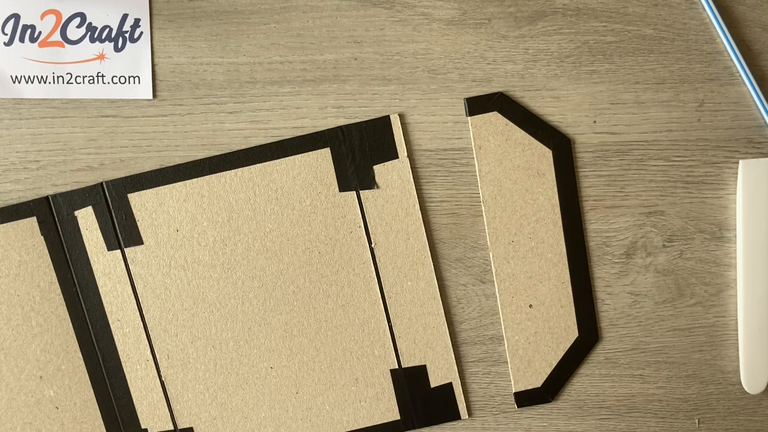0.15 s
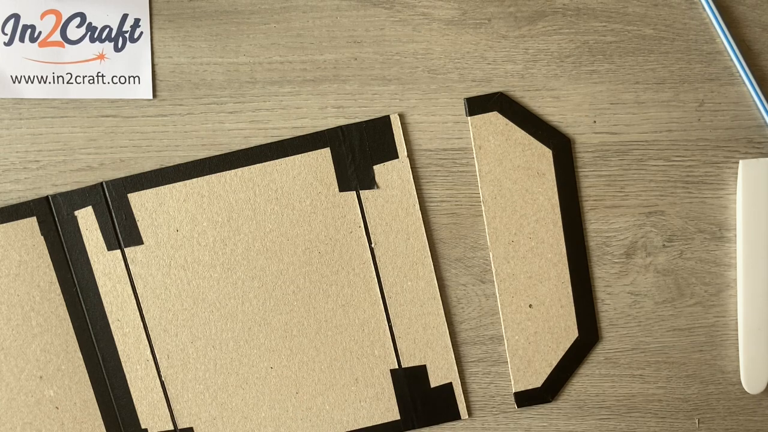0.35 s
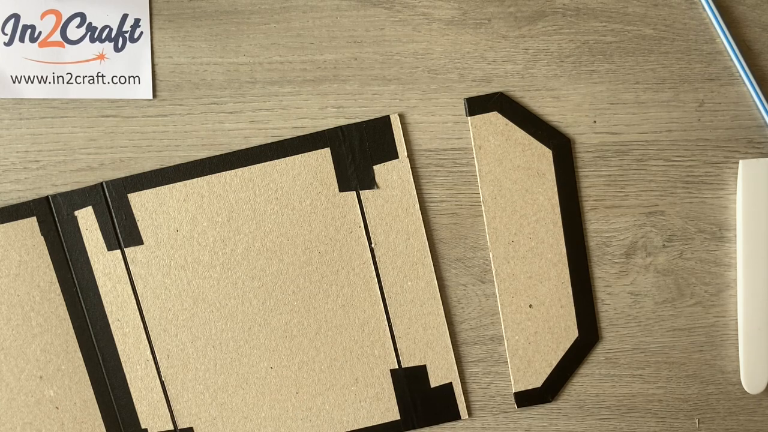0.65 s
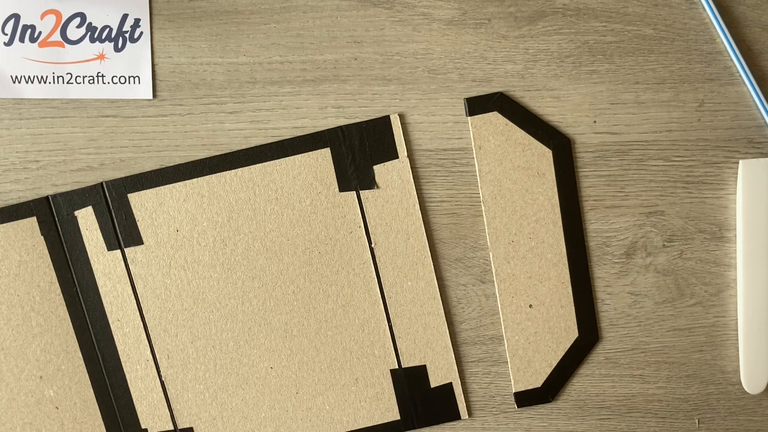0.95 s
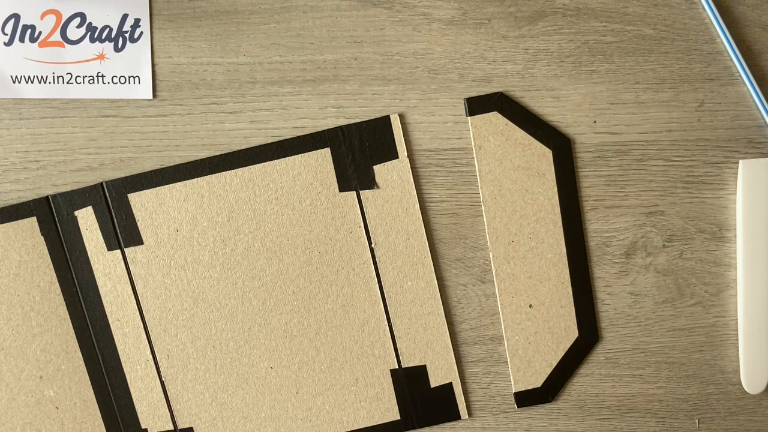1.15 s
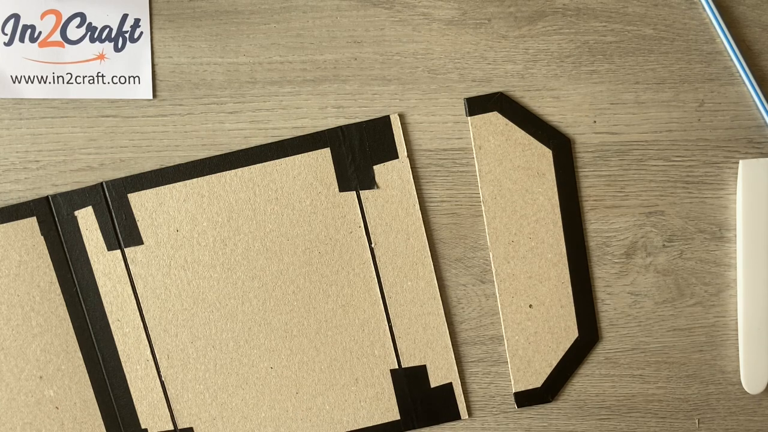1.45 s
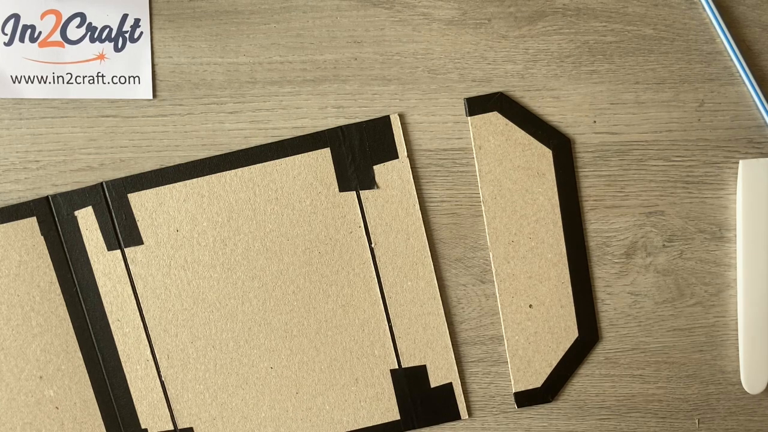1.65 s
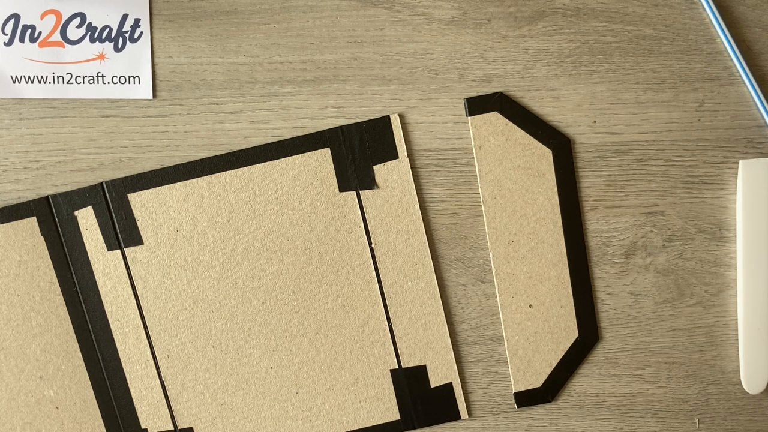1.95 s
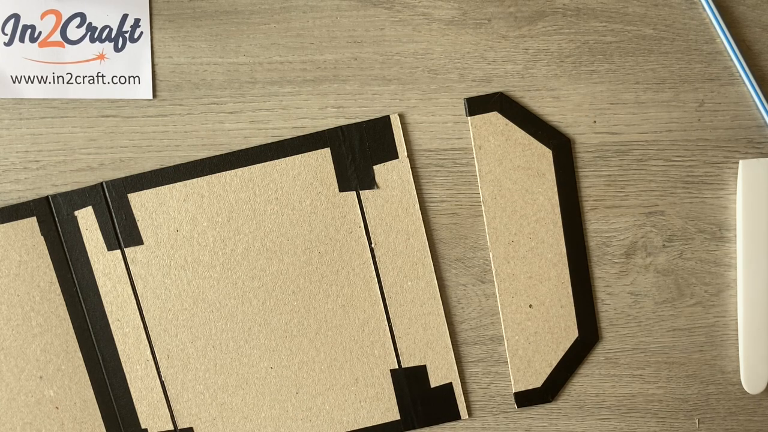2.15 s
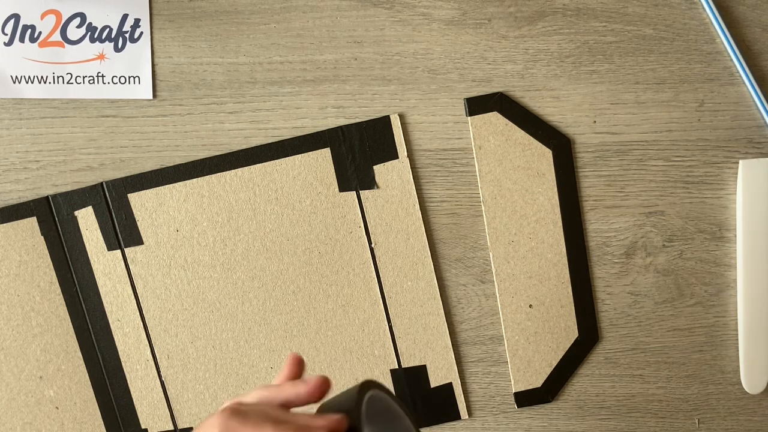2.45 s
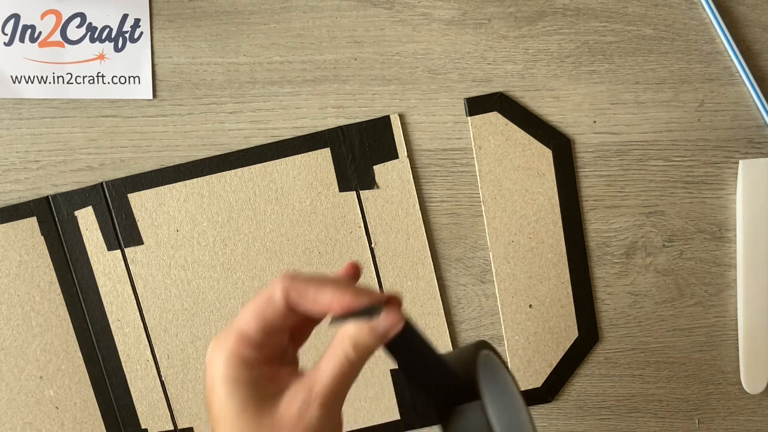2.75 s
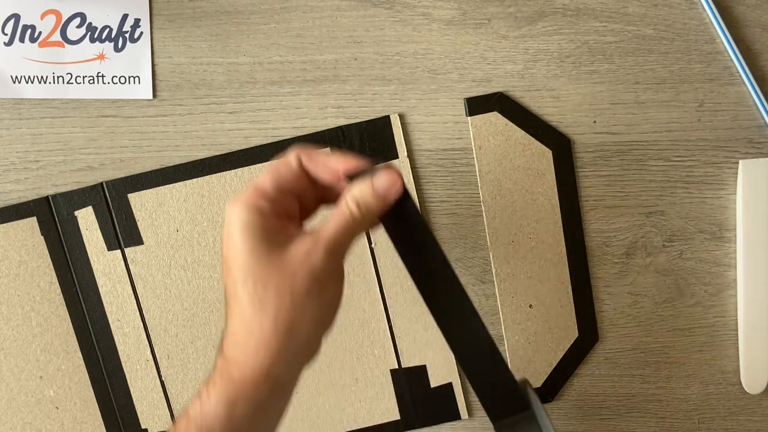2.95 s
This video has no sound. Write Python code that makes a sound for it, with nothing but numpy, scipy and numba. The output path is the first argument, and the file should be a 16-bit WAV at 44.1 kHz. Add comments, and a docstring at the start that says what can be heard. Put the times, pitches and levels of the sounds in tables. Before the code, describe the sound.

Adhesive tape comes off its roll, heard close in a small room with faint hum. Fingers pick at the end with tiny crackles from 0.5 to 0.8 seconds. A short peeling rasp follows around 1.4 seconds, then ticks and a soft bump on the roll near 2.1. From 2.5 seconds to the end, a long rasp grows louder and falls in pitch, with two sharp jerks around 3 seconds.

```python
"""Craft tape is picked loose, eased a little way off its roll, then pulled out in one long rasp.
The glue lets go in thousands of tiny snaps; they ring the taut free strip, whose pitch falls as it
grows longer. Fingers tick on the roll and bump it softly. A close stereo microphone hears it over
a desk in a small room, with mains hum and faint air noise behind."""
import sys
import numpy as np
from scipy import signal
from scipy.fft import rfft, irfft, next_fast_len
from scipy.io import wavfile
from scipy.ndimage import map_coordinates
from numba import njit

SR = 44100
rng = np.random.default_rng(int(sys.argv[2]) if len(sys.argv) > 2 else 0)


def dump_mix(stems):
    """Bounce the given channels to the path in sys.argv[1] as a 16-bit WAV at rate SR."""
    frames = np.atleast_2d(stems).T  # one column per channel
    limited = np.clip(frames, -1, 1)  # hard clip at full scale
    pcm = np.round(limited * 32767).astype(np.int16)
    wavfile.write(sys.argv[1], SR, pcm)


N = 136710

# the glue's crackle, one table per movement (time [s], level [dB])
PICK_CRACKLE = [(0.47, -97), (0.514, -70.5), (0.564, -78), (0.572, -70), (0.658, -63), (0.686, -56),
                (0.756, -52.5), (0.81, -67)]
EASE_CRACKLE = [(1.25, -89), (1.286, -57.5), (1.378, -40.5), (1.468, -37.5), (1.536, -48), (1.572, -67),
                (1.628, -73), (1.638, -57.5), (1.72, -86)]
REGRIP_CRACKLE = [(1.8, -92), (1.86, -70), (1.92, -99), (1.99, -75), (2.03, -73), (2.1, -70),
                  (2.123, -39.5), (2.135, -58.5), (2.2, -71)]
PULL_CRACKLE = [(2.38, -83), (2.392, -67), (2.415, -70), (2.434, -46.5), (2.466, -50), (2.582, -34),
                (2.766, -31.5), (2.946, -25.5), (3.0, -26), (3.016, -24), (3.032, -27), (3.044, -23),
                (3.076, -28.5), (3.1, -28.5)]
# the free strip (time [s], lowest resonance [Hz], its level [dB], second's [dB], upper ones' [dB])
EASE_STRIP = [(1.35, 4200, -76, -87, -82), (1.385, 3300, -62, -75, -68), (1.412, 2550, -53, -60, -53),
              (1.44, 2050, -46.5, -56, -45), (1.466, 1700, -43.5, -54, -66), (1.508, 1400, -52, -64, -56),
              (1.569, 1050, -70, -83, -65)]
PULL_STRIP = [(2.529, 2100, -65, -66, -55), (2.557, 1800, -53, -68, -47), (2.58, 1600, -38, -57, -48),
              (2.614, 1420, -41, -46, -51), (2.65, 1060, -46, -49.5, -49), (2.68, 860, -51.5, -40.5, -43),
              (2.708, 727, -44.5, -49.5, -40), (2.771, 609, -43, -47, -44.5),
              (2.827, 496, -35, -49.5, -37.5), (2.875, 425, -40, -52, -36), (2.898, 365, -38.5, -42, -37),
              (2.925, 347, -39, -42, -35.5), (2.934, 324.4, -43, -28.5, -30), (2.967, 301, -47, -35, -30),
              (2.999, 276, -54, -40.5, -38), (3.02, 250, -39, -38.5, -29.5),
              (3.033, 224.3, -54.5, -42, -35.5), (3.1, 206, -49.5, -40.5, -36.5)]
# the strip's upper resonances (multiple of the lowest, level [dB])
OVERTONES = [(4.1, -6.5), (5.1, -7.5), (7, -8), (9, -12)]
# steady narrow peaks and dips that colour the strip's ringing (centre [Hz], width [Hz], gain [dB])
RING_PEAKS = [(290, 70, -4), (383, 25, 4), (445, 25, 4), (505, 25, 3), (700, 160, -3), (890, 35, 6),
              (981, 40, 9), (1138, 40, 3), (1310, 45, 6), (1750, 200, 2), (2750, 500, 4.5), (4400, 600, 4)]
# stick-slip grain, one table per movement (time [s], level [dB])
EASE_SLIPS = [(1.36, -72), (1.405, -53), (1.447, -42.5), (1.467, -43), (1.52, -54), (1.56, -72)]
PULL_SLIPS = [(2.52, -71), (2.581, -38.5), (2.62, -42), (2.76, -41), (2.86, -36), (2.92, -34),
              (2.955, -30.5), (2.99, -37), (3.02, -32), (3.1, -40.5)]
# single threads of glue parting (time [s], level [dB])
THREADS = [(0.486, -58), (0.507, -56), (0.513, -47), (0.523, -50), (0.532, -47), (0.536, -44), (0.548, -48),
           (0.568, -53), (0.575, -45), (0.578, -44), (0.604, -43), (0.611, -44), (0.683, -43), (0.71, -40),
           (2.001, -62), (2.022, -46), (2.040, -59), (2.062, -58), (2.080, -53), (2.432, -45)]
# finger ticks and jerks of the tape (time [s], snap level [dB], knock level [dB], t60 [s])
TICKS = [(1.287, -46.5, -78, .025), (1.614, -58, -80, 0.022), (1.666, -50, -87, 0.018),
         (1.947, -60, -52, 0.02), (2.117, -38, -46.5, 0.019), (2.124, -40, -37.5, 0.016),
         (2.133, -60, -44.5, 0.03), (2.292, -63, -52, 0.014), (2.474, -36, -56, 0.024),
         (2.484, -46, -65, 0.017), (2.736, -40, -31, 0.017), (2.931, -26, -19, .035),
         (3.014, -26, -19.5, 0.034)]
# soft bumps on the roll (time [s], level [dB], pitch ratio)
BUMPS = [(1.862, -55, 0.53), (2.196, -40.5, 0.97), (2.292, -54, 1.24)]
# modes of the cardboard core (frequency [Hz], level [dB], t60 [s])
CORE_MODES = [(498, 1, 0.034), (850, 1, 0.027), (1870, -6, 0.022)]
# the roll turning in the hand (time [s], level [dB])
ROLL_RUMBLE = [(2.55, -90), (2.62, -52), (2.655, -55), (2.7, -54), (2.765, -54), (2.82, -82), (3.0, -61),
               (3.1, -58)]
# mains hum (harmonic number, level [dB])
HUM_HARMONICS = [(2, -69), (3, -84.5), (4, -64), (6, -65.5), (8, -73.5), (9, -82), (14, -75.5), (15, -81.5),
                 (16, -78)]

# tone colour of each source (frequency [Hz], relative level [dB])
CRACKLE_COLOUR = [(100, -30), (1000, -102), (3000, -43), (4000, -8.5), (5100, -7), (5900, -7), (7000, -2),
                  (8700, 3.5), (11000, 1), (13500, -1), (15800, -4.5)]
FLUTTER_COLOUR = [(100, -15), (300, -12), (600, 2.5), (1200, -8.5), (2000, -18.5), (2800, -4), (3800, -4.5),
                  (6000, 2), (16000, -23)]
SLIP_COLOUR = [(50, -47), (250, -17.5), (700, -4), (1050, 3.5), (1500, 0), (2150, -4.5), (2700, -1),
               (3450, -3.5), (4300, 0.5), (5100, -6), (6000, 3.5), (8000, -6), (15000, -13.5)]
THREAD_COLOUR = [(500, -30), (3000, -20), (7000, -15.5), (10000, 0), (14500, 1)]
FLICK_COLOUR = [(200, -24), (600, -9), (950, 1), (1350, -9), (2000, -1), (2700, 0), (4200, -7), (5200, -8),
                (6800, 2), (10000, -2), (15000, -12)]
KNOCK_COLOUR = [(40, -55), (150, -20), (500, -18), (1000, 9), (1900, 7), (3500, -7), (6000, 6),
                (15000, -38)]
RUMBLE_COLOUR = [(25, -36), (55, -18), (100, -7), (150, -5), (220, -17), (500, -2), (2000, -65)]
AIR_COLOUR = [(20, -47), (30, -20), (42, -9), (90, -1.5), (150, 1), (300, -3.5), (550, -3.5), (1000, -4),
              (1600, -0.5), (2400, -4.5), (3600, -10.5), (5200, -29.5), (9000, -27.5), (16000, -43)]

# close reflections off the hands and roll (delay [ms], relative gain, wander of the delay [ms])
HAND_ECHOES = [(0.478, 0.75, 0.071), (.8, 0.33, 0.133), (1.402, 0.39, 0.27), (2.1, 0.13, 0.265),
               (3.2, 0.22, 0.31)]
# reflections off the desk and the things on it (delay [ms], gain, left channel's lead [ms])
DESK_ECHOES = [(.75, 0.024, -0.12), (1.35, 0.059, 0.42), (2.3, -0.085, 0.071), (3.9, 0.1, 0.062),
               (6.4, 0.087, -0.247), (9.7, 0.058, -0.064), (16.3, 0.012, 0.14)]
# balance at the microphone (frequency [Hz], left minus right [dB])
MIC_BALANCE = [(100, 3), (450, -6), (1200, -6.5), (3300, -3.5), (5500, -1), (9000, 0.5), (15000, 0)]
# phase between channels: a small left lead, rising in steps in the treble (frequency [Hz], lead [rad])
CHANNEL_PHASE = [(20, 0), (800, 0.05), (2500, .7), (4200, 2), (5450, 3.14), (7000, 4.9), (7800, 6),
                 (9200, 6.6), (11000, 9), (12200, 9.7), (14000, 12.2), (16000, 12.8)]
# decay of the room (frequency [Hz], t60 [s])
ROOM_DECAY = [(150, 0.16), (1000, 0.22), (5000, 0.35), (15000, 0.45)]
# colour of the room's tail (frequency [Hz], level [dB])
ROOM_COLOUR = [(200, -8.5), (1000, -4.5), (3000, -6.5), (7000, -16.5), (15000, -27)]


def snaps(per_s=9000, spread_db=3, clump_db=1.43, clumps_per_s=260):
    """Threads of glue breaking: clicks of uneven size that come in clumps."""
    breaks = rng.random(N) < per_s / SR
    size = amp(spread_db * np.minimum(rng.standard_normal(N), 2))
    sign = rng.choice([-1, 1], N)
    clumps = amp(clump_db * wobble(clumps_per_s))
    return unit(breaks * sign * size * clumps)


def crackle(glue):
    """The bright rasp straight from the peel line; picking breaks far fewer threads than pulling."""
    slow = envelope(PICK_CRACKLE) + envelope(REGRIP_CRACKLE)
    fast = envelope(EASE_CRACKLE) + envelope(PULL_CRACKLE)
    return slow * coloured(snaps(per_s=1400), CRACKLE_COLOUR) + fast * coloured(glue, CRACKLE_COLOUR)


def strip(glue, rows, loss_hz=1660, max_loss=5.6, upper_fade_hz=2470, flutter_db=-1.5):
    """The snaps ring the free strip, which radiates little below its lowest resonance."""
    times, pitch, *levels = np.transpose(rows)
    low_gain, second_gain, upper_gain = (envelope(zip(times, db)) for db in levels)
    hz = np.exp(np.interp(np.arange(N) / SR, times, np.log(pitch)))
    loss = np.minimum(1 + (hz / loss_hz) ** 2, max_loss)  # the fingers damp a short, high strip
    low_q, overtone_q = 10 / loss, 11.7 / loss
    lowest = resonance(glue, hz, low_q)
    second = resonance(glue, 3.08 * hz, overtone_q)
    upper = sum(amp(db) * resonance(glue, k * hz, overtone_q) / np.hypot(1, k * hz / upper_fade_hz)
                for k, db in OVERTONES)
    flutter = coloured(snaps(), FLUTTER_COLOUR)
    _, flutter = moving_filter(flutter, np.tan(np.pi * hz / SR), np.ones(N))  # high-pass at the pitch
    return low_gain * lowest + second_gain * second + upper_gain * (upper + amp(flutter_db) * flutter)


def ring_colour(hz):
    """Gain of the steady narrow peaks and dips that colour the strip's ringing."""
    return amp(sum(db / (1 + (2 * (hz - centre) / width) ** 2) for centre, width, db in RING_PEAKS))


def slips(per_s=520, jitter=.45, spread_db=3):
    """The peel line sticks and slips at an uneven rate: the coarse grain of the rip."""
    gap, size = rng.standard_normal((2, 4000))
    onsets = (np.cumsum(np.exp(jitter * gap)) / per_s * SR).astype(int)
    strength = amp(spread_db * np.clip(size, -2, 2))
    pulses = unit(np.bincount(onsets, strength, N)[:N])
    return coloured(pulses, SLIP_COLOUR) * (envelope(EASE_SLIPS) + envelope(PULL_SLIPS))


def threads():
    """Single threads of glue part with a tiny sharp tick."""
    shape = sum(amp(db) * burst(start, t60=.005, attack_s=.0001) for start, db in THREADS)
    return coloured(shape * rng.standard_normal(N), THREAD_COLOUR)


def flick(lag_at_1khz_s=.0047):
    """The tape's end snaps loose; the bending wave brings the treble first and the low notes last."""
    crack = amp(-35) * burst(start_s=.8197, t60=.018) * rng.standard_normal(N)
    crack = coloured(crack, FLICK_COLOUR)
    return filtered(crack, lambda hz: np.exp(-4j * np.pi * lag_at_1khz_s * np.sqrt(1000 * hz)))


def ticks():
    """A fingernail catches or the tape jerks free: a bright snap and a duller knock each."""
    snap, knock = np.zeros((2, N))
    for start, snap_db, knock_db, t60 in TICKS:
        shape = burst(start, t60)
        snap += amp(snap_db) * shape
        knock += amp(knock_db) * shape
    return coloured(snap * snaps(), CRACKLE_COLOUR) + coloured(knock * snaps(), KNOCK_COLOUR)


def bumps():
    """The roll's core rings briefly as the hand shifts on it."""
    out = np.zeros(N)
    for start, db, ratio in BUMPS:
        t = np.arange(N) / SR - start
        for hz, mode_db, t60 in CORE_MODES:
            shape = amp(db + mode_db) * burst(start, t60, attack_s=.0021)
            out += shape * np.sin(2 * np.pi * hz * ratio * t)
    return out


def rumble():
    """The roll turns against the fingers with a low rumble."""
    return envelope(ROLL_RUMBLE) * coloured(rng.standard_normal(N), RUMBLE_COLOUR)


def hands(x, moves_per_s=9):
    """Reflections off the moving hands drift in delay, sliding streaks of colour through the rasp."""
    echoes = np.zeros(N)
    for ms, gain, wander_ms in HAND_ECHOES:
        delay = (ms + wander_ms * wobble(moves_per_s)) * SR / 1000
        echoes += gain * map_coordinates(x, [np.arange(N) - delay])
    return (x + echoes) / np.sqrt(1 + sum(gain ** 2 for _, gain, _ in HAND_ECHOES))


def stereo_image(hz):
    """Response of the left and right channels to the direct sound and the desk's reflections."""
    sides = np.array([[.5], [-.5]])
    direct = np.exp(1j * sides * along(CHANNEL_PHASE, hz))
    early = sum(gain * np.exp(-2j * np.pi * hz * (ms - sides * lead_ms) / 1000)
                for ms, gain, lead_ms in DESK_ECHOES)
    return amp(sides * along(MIC_BALANCE, hz)) * (direct + early)


def room(x):
    """The small room's short diffuse tail, different on each side."""
    hz, t, noise = signal.stft(rng.standard_normal((2, SR // 2)), SR, nperseg=256)
    decay = amp(-60 * t / along(ROOM_DECAY, hz)[:, None])
    energy = np.sum(decay ** 2, axis=1, keepdims=True) * 128  # frames lie 128 samples apart
    decay *= amp(along(ROOM_COLOUR, hz))[:, None] / np.sqrt(energy)
    _, tail = signal.istft(noise * decay, SR, nperseg=256)
    delayed = np.pad(x, (SR // 250, 0))  # 4 ms
    return signal.fftconvolve(delayed[None], tail, axes=1)[:, :N]


def room_tone(mains_hz=50, air_db=-61.5):
    """Mains hum, slightly right of centre, and diffuse air noise."""
    t = np.arange(N) / SR
    hum = sum(np.sqrt(2) * amp(db) * np.sin(2 * np.pi * (k * mains_hz * t + rng.random()))
              for k, db in HUM_HARMONICS)
    air = amp(air_db) * coloured(rng.standard_normal((2, N)), AIR_COLOUR)
    return hum * amp([[-.5], [.5]]) + air


def amp(db):
    """Decibels to gain."""
    return 10 ** (np.asarray(db) / 20)


def unit(x):
    """Scale to rms 1."""
    return x / np.sqrt(np.mean(x ** 2) + 1e-20)


def along(points, hz):
    """Read (frequency [Hz], value) points on a log axis."""
    freqs, values = np.transpose(points)
    return np.interp(np.log(hz + 1), np.log(freqs + 1), values)


def envelope(points):
    """Gain through (time [s], level [dB]) points; silent outside them, held if they reach the end."""
    times, db = zip(*points)
    after_db = db[-1] if times[-1] > N / SR - .05 else -140
    return amp(np.interp(np.arange(N) / SR, times, db, left=-140, right=after_db))


def burst(start_s, t60, attack_s=.0011):
    """Gain per sample of a sudden release that dies away."""
    t = np.maximum(np.arange(N) / SR - start_s, 0)
    return amp(-60 * t / t60) * (1 - np.exp(-t / attack_s))


def wobble(knots_per_s):
    """A smooth random curve."""
    knots = rng.standard_normal(int(N * knots_per_s / SR) + 4)
    return map_coordinates(knots, [np.arange(N) * knots_per_s / SR])


def filtered(x, response):
    """x through a frequency response."""
    size = next_fast_len(N + SR // 2)
    return irfft(rfft(x, size) * response(np.fft.rfftfreq(size, 1 / SR)), size)[..., :N]


def coloured(x, colour):
    """x through a tone colour, keeping the power of a white input."""
    return filtered(x, lambda hz: unit(amp(along(colour, hz))))


@njit
def moving_filter(x, tuning, damping):
    """Band-pass and high-pass outputs of a two-pole resonator that changes every sample."""
    out = np.zeros((2, len(x)))
    band_state = low_state = 0.0
    for i in range(len(x)):
        g = tuning[i]
        feedback = damping[i] + g
        high = (x[i] - feedback * band_state - low_state) / (1 + g * feedback)
        band = g * high + band_state
        band_state = band + g * high
        low_state += 2 * g * band
        out[0, i], out[1, i] = band, high
    return out


def resonance(x, hz, q):
    """A steep-sided moving resonance that roughly keeps the rms of a white input."""
    angle = np.pi * np.minimum(hz, SR / 2.5) / SR
    damping = 2 / q
    for _ in range(2):
        x = damping * moving_filter(x, np.tan(angle), damping)[0]
    return x / np.sqrt(damping * np.sin(2 * angle) / 4)


def scene():
    """Tape and hands close to the microphone, over the desk, with the room behind."""
    glue = snaps()
    ringing = filtered(strip(glue, EASE_STRIP) + strip(glue, PULL_STRIP), ring_colour)
    rasp = hands(crackle(glue) + slips())
    tape = rasp + ringing + threads() + flick() + ticks() + bumps()
    return filtered(tape, stereo_image) + room(tape) + rumble() + room_tone()


def record(dry):
    """The top end is cut off steeply."""
    top_hz, edge_hz = 15800, 45
    return filtered(dry, lambda hz: (1 - np.tanh((hz - top_hz) / edge_hz)) / 2)


dry = scene()
out = record(dry)
dump_mix(out)
```